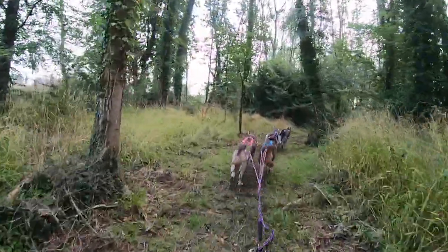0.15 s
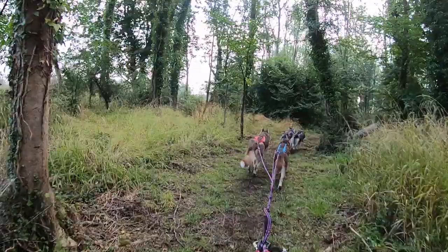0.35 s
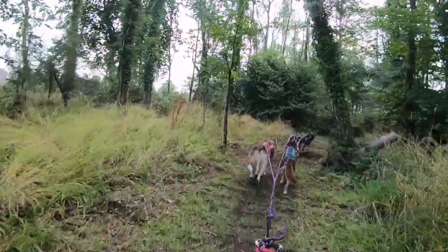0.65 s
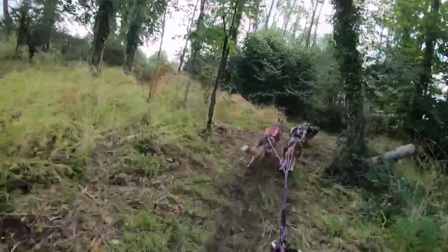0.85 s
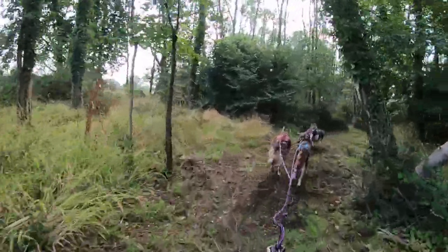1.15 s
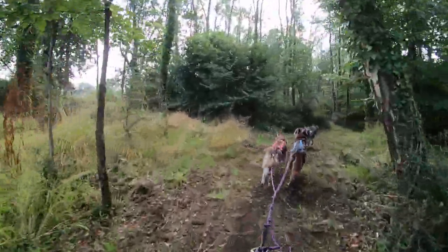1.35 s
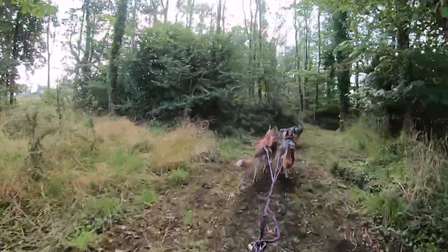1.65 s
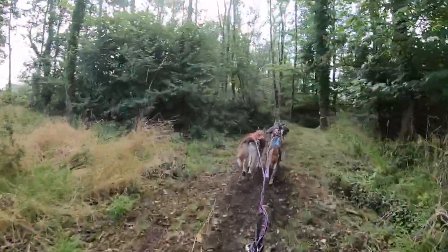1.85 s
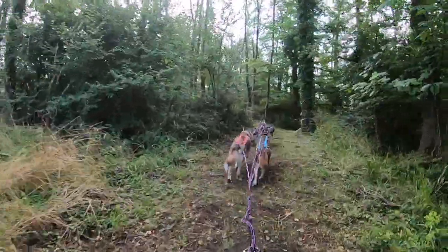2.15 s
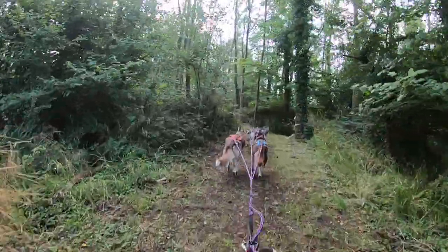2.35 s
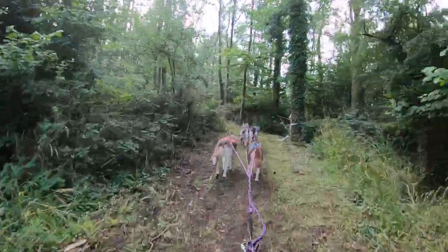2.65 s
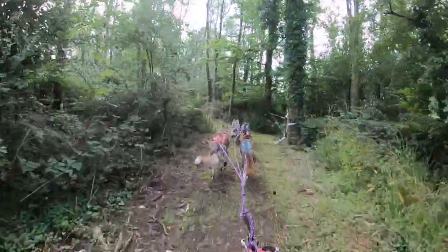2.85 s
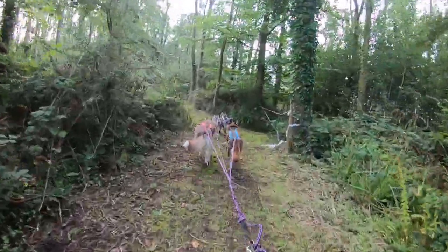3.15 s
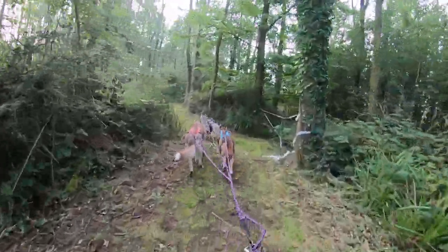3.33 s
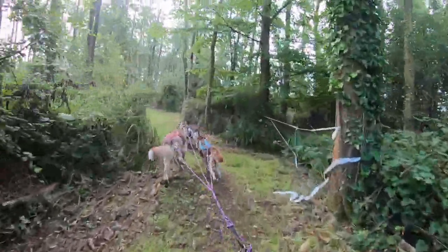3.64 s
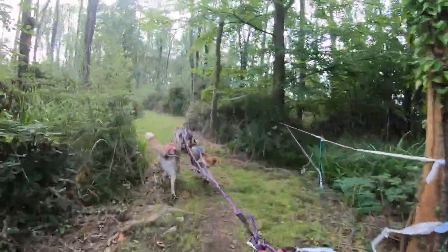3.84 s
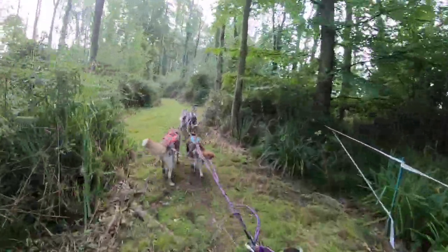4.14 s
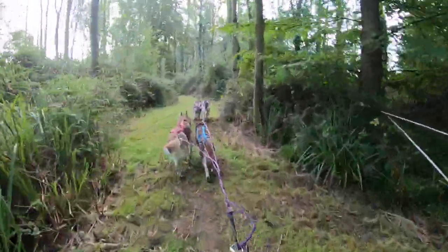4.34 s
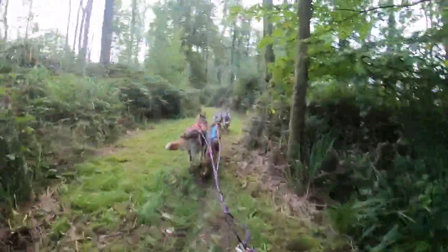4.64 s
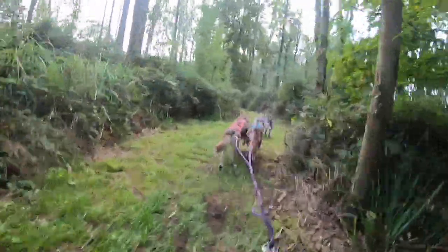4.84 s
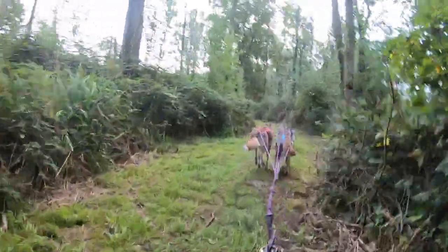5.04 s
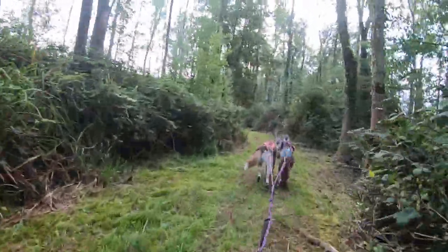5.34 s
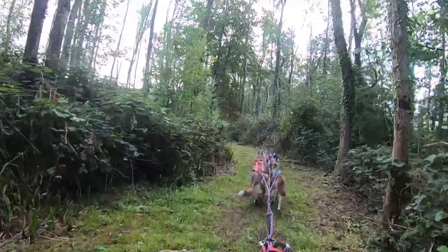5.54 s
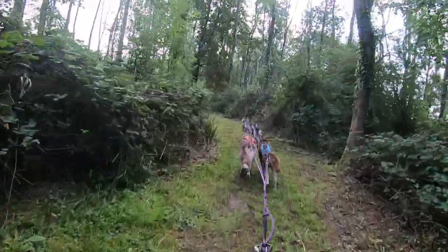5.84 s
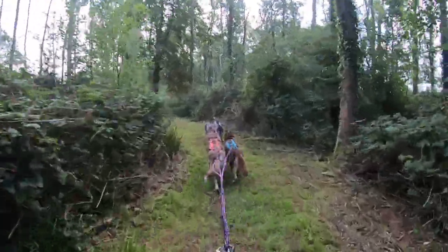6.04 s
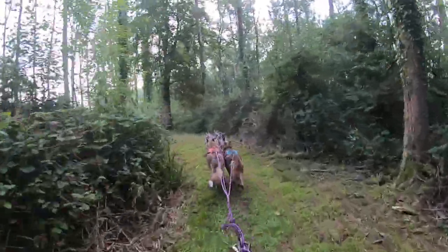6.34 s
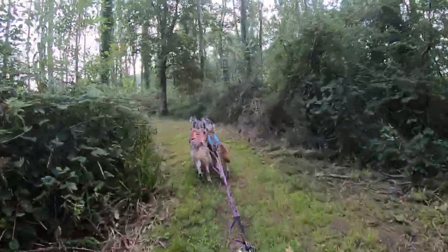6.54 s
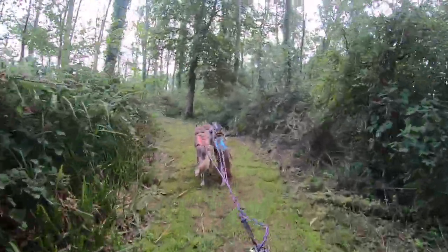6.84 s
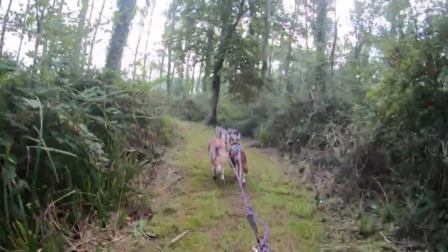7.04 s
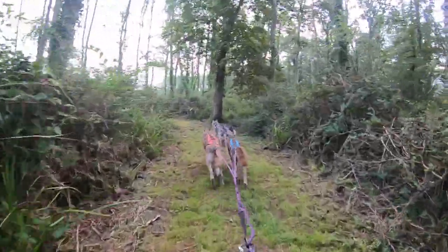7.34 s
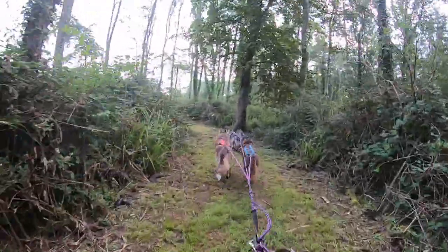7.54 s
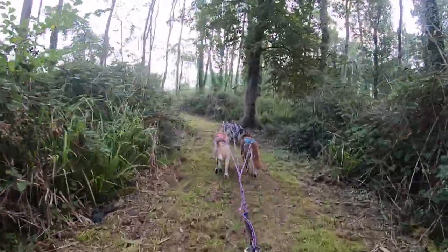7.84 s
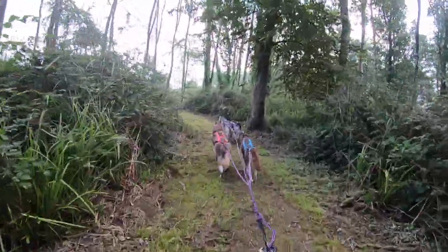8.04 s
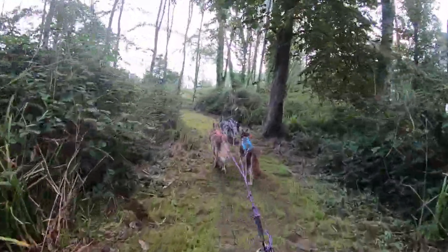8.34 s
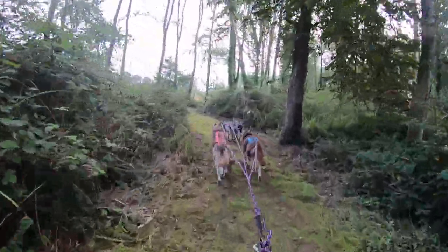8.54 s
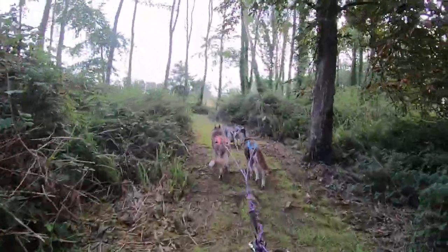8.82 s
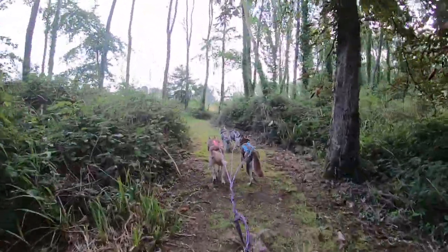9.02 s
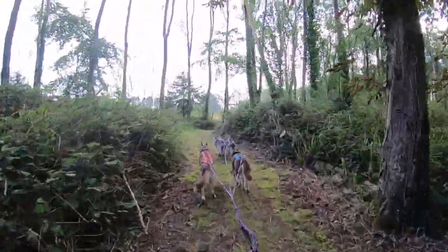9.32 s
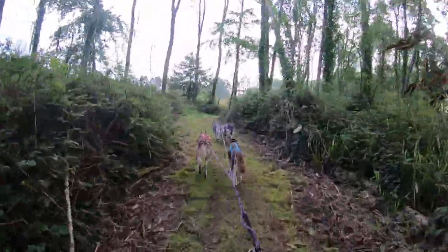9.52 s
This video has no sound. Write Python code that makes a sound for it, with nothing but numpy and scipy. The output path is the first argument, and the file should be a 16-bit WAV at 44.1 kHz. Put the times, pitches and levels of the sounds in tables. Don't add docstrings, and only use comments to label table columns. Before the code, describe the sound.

Close on the frame of a light rig pulled by dogs along a bumpy woodland path, a low uneven rumble and soft tyre roll continue throughout. Wheels thump on roots, loose parts rattle in bursts, and a metal clip clinks several times early on. The densest clatter comes around the middle, then scattered knocks and hollow tube taps follow to the end.

```python
import sys
import numpy as np
from scipy import signal
from scipy.io import wavfile

SR = 44100
rng = np.random.default_rng(int(sys.argv[2]) if len(sys.argv) > 2 else 0)


def convert_level_to_amplitude(level_db):
    exponent = np.asarray(level_db, float) / 20
    return 10 ** exponent


def master_out(mix):
    frames = np.transpose(np.atleast_2d(mix))
    ceiling = np.clip(frames, -1, 1)
    pcm = np.round(ceiling * 32767).astype(np.int16)
    wavfile.write(sys.argv[1], SR, pcm)


N = 426888

# f/Hz, width/Hz, level/dB
FRAME = [(26, 12, -9), (31.4, 10, -1.5), (51, 18, 2), (80, 29, 1), (129, 53, -7)]
# f/Hz, width/Hz, level/dB
DULL = [(550, 314, 7.5), (780, 55, -6.5), (1100, 230, 1)]
HARD = [(1530, 265, -2.5), (1960, 184, 1.5), (2586, 505, 1), (2864, 740, 0.5), (3368, 363, 3),
        (4440, 970, -7)]
BRIGHT = [(5120, 1400, 9), (6870, 370, 0.5), (6900, 1700, -8.5), (8830, 280, -8), (9200, 1100, -47)]
# t/s, length/s, knock level/dB, dull part/dB
PATCHES = [(0.066, 0.026, -23.5, 1), (0.311, 0.062, -21.5, 1), (0.963, 0.11, -16, 0),
           (1.3012, .082, -25, 1.5), (3.6688, 0.038, -22.5, 0), (3.8874, 0.061, -25, -2),
           (4.0148, 0.036, -19, -4), (4.207, 0.025, -22, 1), (4.3635, 0.039, -16, -6),
           (4.47, 0.12, -20.5, -1.5), (4.684, 0.093, -15.5, -3.5), (4.8071, 0.11, -13, -3),
           (4.958, 0.084, -13, -1), (5.064, 0.048, -16, -1), (5.165, 0.12, -12.5, -0.5),
           (5.4885, 0.021, -24, -34), (5.772, 0.1, -26, 0.5), (6.034, 0.054, -24, -8),
           (6.126, 0.043, -20, 0), (6.201, 0.078, -14.5, -18), (6.5545, .022, -20, 3.5),
           (7.018, 0.068, -18.5, -1), (7.103, 0.044, -11, 1.5), (7.22, 0.063, -20.5, 3.5),
           (7.7, 0.059, -24.5, -7), (8.1412, 0.04, -15.5, -3), (8.7067, 0.043, -12.5, -0.5),
           (8.817, 0.07, -18, 0), (9.0562, 0.063, -17.5, -5), (9.4362, 0.029, -21.5, 4.5)]


def rms_one(x):
    return x / np.sqrt(np.mean(x ** 2) + 1e-20)


def low_pass(x, hz):
    return signal.sosfilt(signal.butter(2, hz, fs=SR, output="sos"), x)


def drift(rate_hz):
    step = 40
    run_in = 2000
    r = np.exp(-2 * step * np.pi * rate_hz / SR)
    noise = rng.standard_normal(N // step + run_in + 2)
    slow = signal.lfilter([1], [1, -2 * r, r * r], noise)[run_in:]
    return np.interp(np.arange(N) / step, np.arange(len(slow)), rms_one(slow))


def resonance(x, hz, width_hz):
    r = np.exp(-np.pi * width_hz / SR)
    w = 2 * np.pi * hz / SR
    return signal.lfilter(np.array([1, 0, -1]) * (1 - r * r) / 2, [1, -2 * r * np.cos(w), r * r], x)


def body(x, peaks, patchy_db, rate_hz):
    out = 0
    for k, (hz, width_hz, db) in enumerate(peaks):
        drive = x * convert_level_to_amplitude(db + patchy_db * drift(rate_hz))
        out = out + (-1) ** k * resonance(drive, hz, width_hz)
    return out


def coloured(spectrum, patchy_db, rate_hz):
    hz, db = np.transpose(spectrum)
    edges = np.geomspace(hz[0], hz[-1], num=int(3 * np.log2(hz[-1] / hz[0])) + 2)
    white = rng.standard_normal((2, N))
    together = drift(rate_hz)
    out = 0
    for k, (low, high) in enumerate(zip(edges, edges[1:])):
        band = signal.sosfilt(signal.butter(2, [low, high], "band", fs=SR, output="sos"), white[k % 2])
        level_db = np.interp(np.log(low * high) / 2, np.log(hz), db)
        out = out + band * convert_level_to_amplitude(level_db + patchy_db * (0.7 * together + drift(rate_hz)))
    return rms_one(out)


def bursts(times, db, decay_s, rise_s=0.00081):
    marks = np.full(N, 1e-18)
    places = np.minimum((np.asarray(times) * SR).astype(int), N - 1)
    np.add.at(marks, places, convert_level_to_amplitude(db))
    fall = np.exp(-1 / (decay_s * SR))
    rise = np.exp(-1 / (rise_s * SR))
    swell = signal.lfilter([1 - rise], np.convolve([1, -fall], [1, -rise]), marks)
    return swell * rng.uniform(-1.7, 1.7, N)


def shudder(sway_db, bend_db):
    sway = body(rng.standard_normal(N), FRAME[:3], patchy_db=-4.0, rate_hz=7.4)
    bend = body(rng.standard_normal(N), FRAME[3:], patchy_db=1.5, rate_hz=13.7)
    return convert_level_to_amplitude(sway_db) * rms_one(low_pass(sway, 72)) + convert_level_to_amplitude(bend_db) * rms_one(low_pass(bend, 149))


def thuds():
    # t/s, peak level/dB
    roots = [(0.0964, -30), (0.344, -12.5), (0.448, -21.5), (0.7843, -15.5), (0.9105, -16.5), (1.316, -17),
             (1.614, -19.5), (1.9108, -21), (2.0288, -15), (2.4942, -21.5), (2.939, -14), (3.231, -22.5),
             (3.6742, -13), (3.919, -30), (4.0304, -22), (4.389, -26), (4.51, -18), (4.955, -14.5),
             (5.71, -21), (6.0313, -19), (6.558, -19), (6.8605, -19), (7.1213, -11), (7.417, -29),
             (7.54, -19.5), (7.714, -23), (7.859, -18), (8.1414, -14.5), (8.705, -13), (9.452, -34)]
    # f/Hz, width/Hz, level/dB
    wheel = [(336, 257, 0.5), (542, 126, 5), (820, 570, -7)]
    s, db = np.transpose(roots)
    blow = bursts(s, db, decay_s=0.0086, rise_s=0.00054)
    jolt = body(blow, FRAME[3:] + [(184, 144, -5.0)], patchy_db=6.0, rate_hz=1.1)
    ring = body(blow, wheel, patchy_db=1.0, rate_hz=33)
    return convert_level_to_amplitude(17) * low_pass(jolt, 300) + convert_level_to_amplitude(11) * low_pass(ring, 2500)


def tyre_roll(level_db):
    # f/Hz, level per Hz/dB
    dirt = [(82, -37), (140, -6), (199, -4), (490, -11.5), (900, -25), (1170, -63), (1980, -120)]
    return convert_level_to_amplitude(level_db) * coloured(dirt, patchy_db=2.0, rate_hz=24)


def knock_times():
    # t/s, length/s, knock level/dB, dull part/dB
    ripples = [(0.891, 0.068, -36, 8), (1.15, .04, -34, 1), (2.2, 0.034, -40, 15.5), (2.95, 0.018, -33, 4),
               (3.04, 0.033, -34, 10), (3.592, 0.063, -34.5, -2), (5.37, 0.14, -27.5, -2),
               (6.334, 0.051, -35, -6), (6.433, 0.035, -29.5, 3.5), (6.501, .018, -32, -4),
               (6.623, 0.056, -34.5, -4), (6.838, 0.055, -32, 6), (7.298, 0.023, -37, -3),
               (7.162, 0.025, -25.5, -1), (7.613, .06, -37.5, -11), (5.899, 0.035, -34, -2),
               (7.95, 0.061, -32, -2), (8.336, 0.0084, -32, -3), (8.399, 0.0057, -27, -9),
               (0.396, .01, -34, 5), (0.569, 0.0097, -38, -8), (8.539, 0.02, -32, 6),
               (9.491, 0.043, -29, -12), (9.643, .02, -28.5, -1)]
    # t/s, peak level/dB, dull part/dB
    lone = [(0.0102, -24.5, -2.5), (0.4495, -36, 1), (0.787, -31, 3), (0.907, -34, 13), (1.43, -21.5, 5),
            (1.4498, -18, -8), (1.607, -30, 1), (2.0296, -28.5, 2), (2.3004, -20, 0), (2.3821, -18, -20),
            (2.401, -16.5, -18), (2.496, -42, -6), (2.8249, -28.5, 9.5), (3.231, -45, 16),
            (3.4196, -18.5, -3), (4.143, -24.5, 12.5), (4.6262, -19, 0), (5.3208, -13, -17),
            (5.368, -29, -11), (5.591, -25.5, 6.5), (5.998, -27, -29), (6.422, -27, 3), (6.729, -21.5, 3),
            (6.7519, -18, 0), (6.823, -22.5, 1), (7.3228, -27.5, -3), (7.5455, -23.5, -14),
            (7.867, -26, -8), (9.0218, -23.5, 2.5), (9.6739, -12, 1)]
    start, length, db, dull_db = np.transpose(PATCHES + ripples)[:, :, None]
    gap, size, colour = rng.standard_normal((len(start), 3, 16)).transpose(1, 0, 2)
    steps = 0.0135 * np.exp(0.22 * gap)
    late = np.cumsum(steps, axis=1) - steps[:, :1]
    fade_db = 3000 * np.maximum(late - length, 0)
    level_db = db + 2.5 * size - fade_db
    rows = np.stack([start + late, level_db, dull_db + 3.0 * colour]).reshape(3, -1)
    return np.hstack([rows, np.transpose(lone)])


def knocks():
    s, db, dull_db = knock_times()
    snap = bursts(s, db + 1, decay_s=0.0011, rise_s=0.0003)
    faint_swell = bursts(np.maximum(s - 0.01, 0), db - 20, decay_s=0.009, rise_s=0.006)
    press = bursts(s, db + dull_db, decay_s=0.003, rise_s=0.001) + convert_level_to_amplitude(10.5) * faint_swell
    dull = convert_level_to_amplitude(14.5) * body(press, DULL[1:], patchy_db=2.0, rate_hz=27)
    hard = convert_level_to_amplitude(14) * body(snap + faint_swell, HARD, patchy_db=1.2, rate_hz=30)
    bright = convert_level_to_amplitude(-6.5) * body(snap + 0.5 * faint_swell, BRIGHT, patchy_db=2.0, rate_hz=66)
    return low_pass(dull, 1950) + hard + bright


def chatter(level_db):
    bounce_hz = 135 * convert_level_to_amplitude(3.0 * drift(40))
    bounces = np.cumsum(bounce_hz / SR)
    born = np.flatnonzero(np.diff(bounces.astype(int)))
    sizes_db = 3.0 * np.minimum(rng.exponential(1, N), 2.2) + 1.8 * drift(8)
    touches = bursts(born / SR, sizes_db[born], decay_s=0.0013)
    dull = convert_level_to_amplitude(8.5) * body(touches, DULL, patchy_db=6.5, rate_hz=60)
    hard = body(touches, HARD, patchy_db=8.0, rate_hz=15.7)
    bright = convert_level_to_amplitude(-20) * body(touches, BRIGHT, patchy_db=3.0, rate_hz=23)
    return convert_level_to_amplitude(level_db + 0.06) * rms_one(dull + hard + bright)


def clinks():
    # t/s, peak level/dB
    strikes = [
        (1.053, -8),
        (1.4462, -13),
        (1.507, -37),
        (2.398, -17),
        (3.4136, -15.5),
    ]
    clip = [(1860, 64, 2), (2800, 190, -3), (5060, 29, 1), (5210, 81, 5), (5780, 75, -9), (6270, 240, 0),
            (7780, 73, -0.5)]
    s, db = np.transpose(strikes)
    scrape = bursts(s, db, decay_s=0.008, rise_s=0.002) + bursts(s, db - 18, decay_s=0.035)
    lead_in = bursts(s - 0.02, db - 10, decay_s=0.008, rise_s=0.008)
    rough = convert_level_to_amplitude(-3) * body(scrape, HARD[:1] + HARD[5:] + BRIGHT, patchy_db=1.5, rate_hz=60)
    return rough + convert_level_to_amplitude(8.5) * body(scrape + lead_in, clip, patchy_db=2.0, rate_hz=22)


def tonks():
    # t/s, peak level/dB, pitch f/Hz
    hollow = [(1.557, -38, 3130), (2.107, -21, 1860), (5.588, -19, 2550), (6.75, -16.5, 1920),
              (7.4064, -31, 1720), (7.498, -25, 1120), (7.5532, -26, 1530), (7.6835, -24, 1050),
              (7.8609, -19, 1120), (7.866, -22, 2140), (8.113, -23.5, 1190), (9.3464, -24.5, 1710)]
    out = np.zeros(N)
    t = np.arange(1500) / SR
    for s, db, hz in hollow:
        swell = t / 0.0036 * np.exp(-t / 0.0048)
        blow = convert_level_to_amplitude(db + 18) * rng.standard_normal(len(t)) * swell
        ring = resonance(resonance(blow, hz, width_hz=230), hz, width_hz=4300)
        out[int(s * SR):][:len(t)] += ring
    return out


def tinks():
    # t/s, peak level/dB
    ticks = [(0.411, -36), (0.828, -42), (1.154, -26), (1.352, -26), (2.041, -26.5), (2.1097, -23.5),
             (2.5017, -38), (2.5666, -35), (2.8438, -36), (2.9383, -35), (3.8404, -26.5), (4.3231, -41),
             (4.4742, -37), (5.0018, -21), (5.594, -33), (6.7531, -43), (7.413, -29), (7.751, -35),
             (8.3607, -32.5), (8.4218, -39), (9.2585, -34), (9.4918, -26.5)]
    # f/Hz, width/Hz, level/dB
    buckle = [(8640, 210, -6), (9500, 170, -20)]
    s, db = np.transpose(ticks)
    tick = bursts(s, db, decay_s=0.003)
    ring = convert_level_to_amplitude(16) * body(tick, buckle, patchy_db=2.2, rate_hz=10)
    return ring + convert_level_to_amplitude(-8) * body(tick, BRIGHT, patchy_db=1.0, rate_hz=30)


def swish():
    # t/s, level/dB
    passing = [
        (2.40, -89),
        (2.5, -48.5),
        (2.7, -52),
        (2.82, -53),
        (2.9, -80),
    ]
    # f/Hz, width/Hz, level/dB
    tuft = [(3200, 1900, -0.5), (5500, 1600, 2), (7760, 1100, 0)]
    level_db = np.interp(np.arange(N) / SR, *np.transpose(passing), left=-120, right=-120)
    return convert_level_to_amplitude(level_db) * rms_one(body(rng.standard_normal(N), tuft, patchy_db=1.0, rate_hz=15))


def grass_brush(level_db):
    # f/Hz, level per Hz/dB
    blades = [(800, -5.5), (1000, -3), (2000, -4), (4000, -16), (8200, -20.5), (9500, -32.5), (11500, -33),
              (15500, -55)]
    return convert_level_to_amplitude(level_db) * coloured(blades, patchy_db=1.5, rate_hz=14)


def roughness():
    t = np.arange(0, N, 40) / SR
    out = 0
    for start, length, db, _ in PATCHES:
        inside_s = np.minimum(t - start, start + length - t)
        edge = np.clip(inside_s / 0.031 + 1, 0, 1)
        out = np.maximum(out, edge * (1 + 0.037 * (db + 21.5)))
    return np.interp(np.arange(N) / SR, t, out)


def scene():
    # t/s, level/dB
    ride = [(0.0, -20), (0.38, -18.5), (0.48, -28), (0.97, -16), (1.89, -24), (2.4, -14.5), (2.51, -21.5),
            (5.2, -16.5), (5.63, -19.5), (5.77, -20.5), (7.01, -19), (7.04, -16.5), (7.57, -23.5),
            (7.79, -18), (7.93, -23.5), (8.71, -17.5), (9.25, -21), (9.68, -14.5)]
    ride_db = np.interp(np.arange(N) / SR, *np.transpose(ride))
    rough = roughness()
    mean_db = ride_db.mean()

    def follow(offset_db, share, lift_db):
        return mean_db + offset_db + share * (ride_db - mean_db) + lift_db * rough

    lumps_db = 1.6 * drift(9)
    frame = shudder(follow(-2.5, 0.84, 3.5) + lumps_db, follow(-3.5, 0.84, 3) + lumps_db)
    roll = tyre_roll(follow(-16, 0.61, 7) + lumps_db)
    loose = chatter(follow(-26, 1.43, 8.3))
    grass = grass_brush(follow(-28.5, 0.55, 5.7))
    blows = thuds() + knocks() + clinks() + tonks() + tinks()
    return (frame + roll + loose + blows + swish() + grass)[None]


def roll_off(x):
    return signal.sosfilt(signal.butter(12, 15700, fs=SR, output="sos"), x)


def record(dry):
    edge_hz = 10570
    rounded = 0.92 * np.tanh(dry / 0.95)
    passed = signal.sosfilt(signal.cheby2(8, 50, edge_hz * 1.186, fs=SR, output="sos"), rounded)
    shelf = signal.sosfilt(signal.butter(3, [edge_hz, 14500], "band", fs=SR, output="sos"), rounded)
    return roll_off(passed + convert_level_to_amplitude(-15) * shelf)


dry = scene()
out = record(dry)
master_out(out)
```